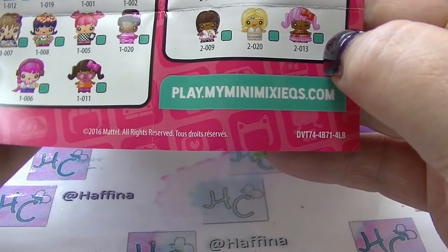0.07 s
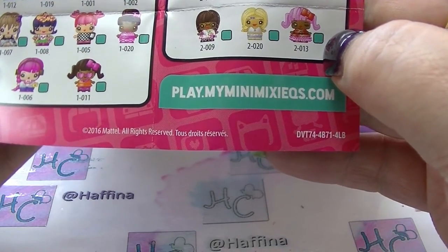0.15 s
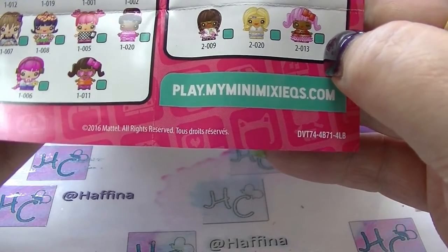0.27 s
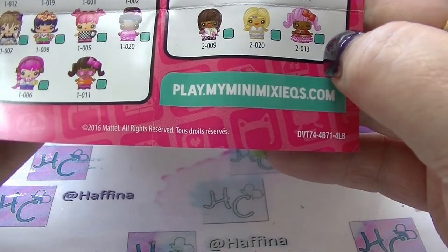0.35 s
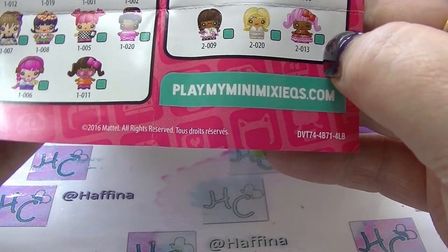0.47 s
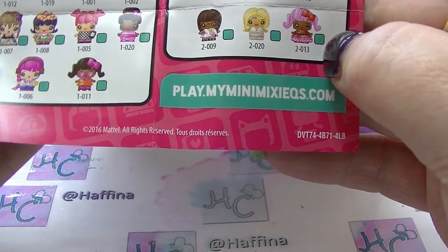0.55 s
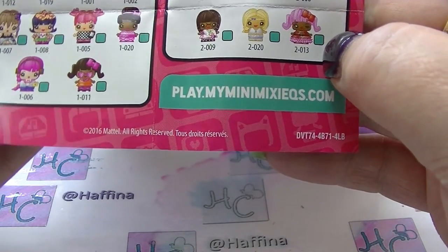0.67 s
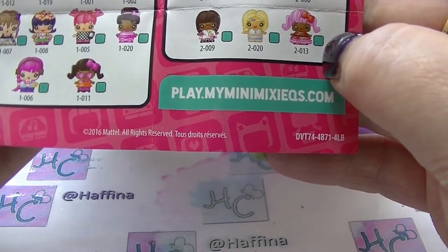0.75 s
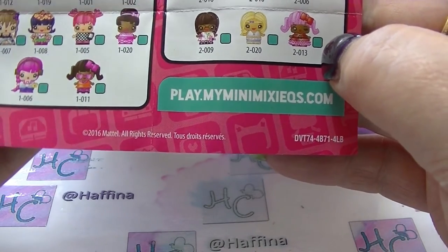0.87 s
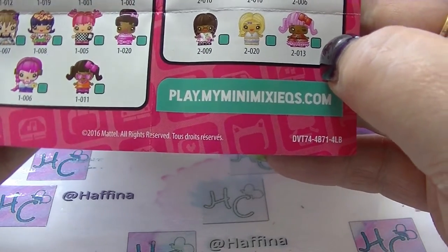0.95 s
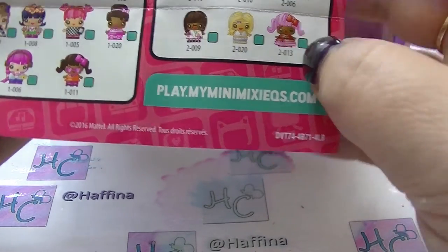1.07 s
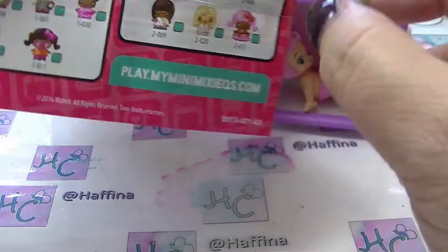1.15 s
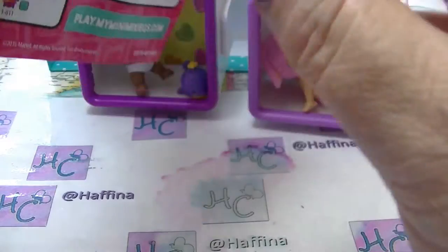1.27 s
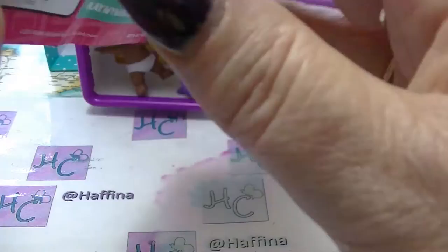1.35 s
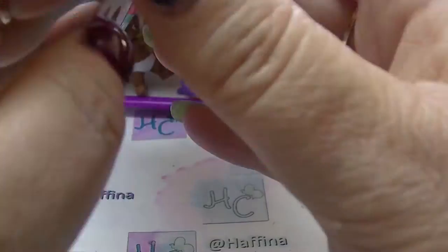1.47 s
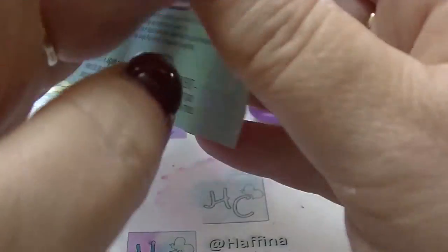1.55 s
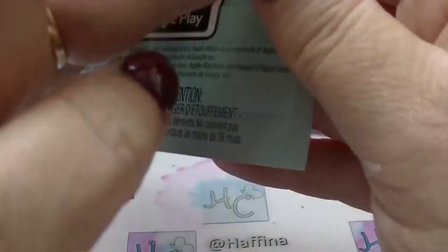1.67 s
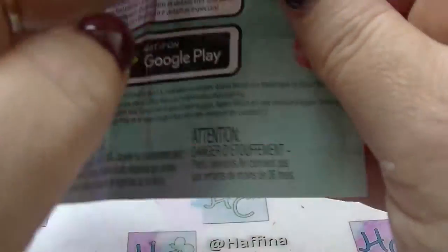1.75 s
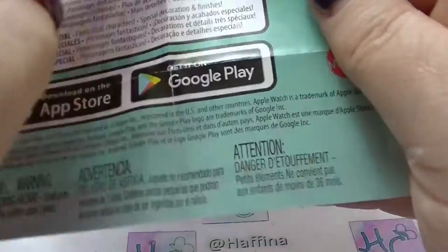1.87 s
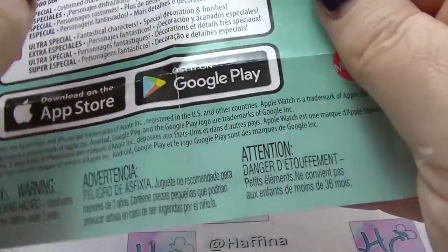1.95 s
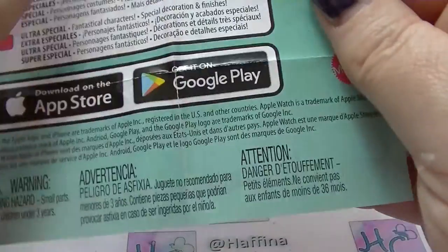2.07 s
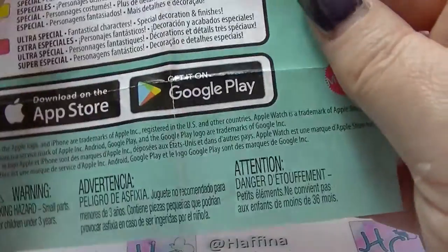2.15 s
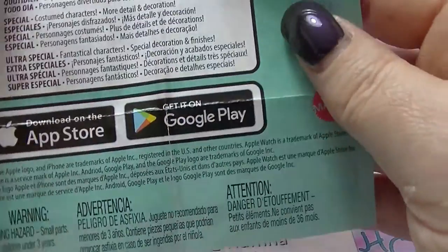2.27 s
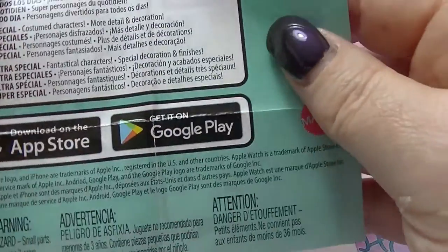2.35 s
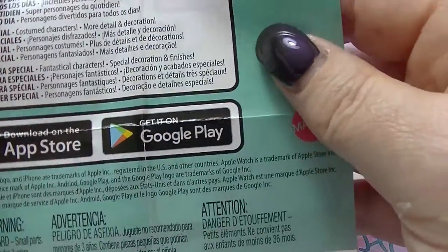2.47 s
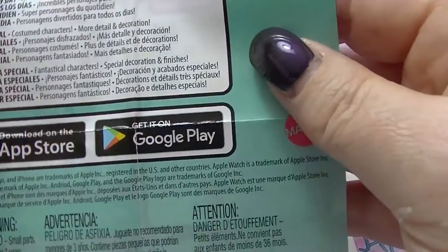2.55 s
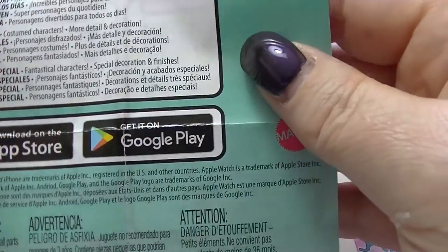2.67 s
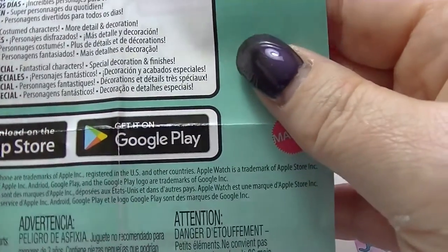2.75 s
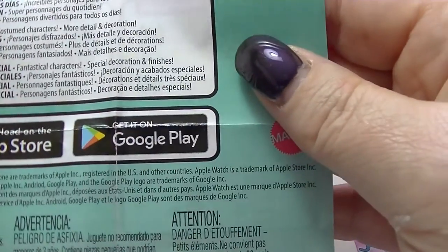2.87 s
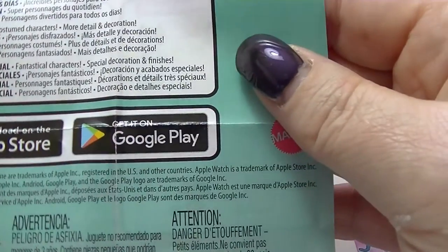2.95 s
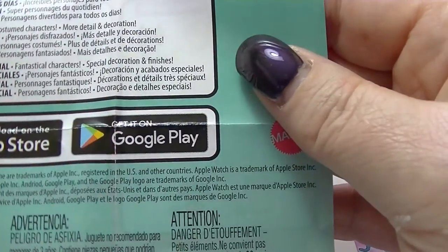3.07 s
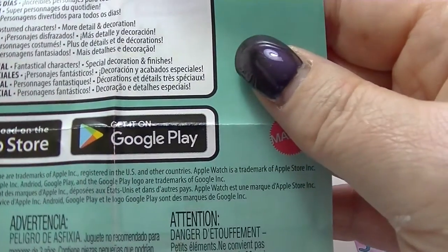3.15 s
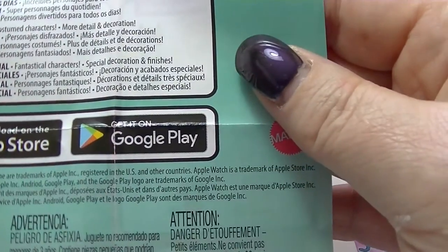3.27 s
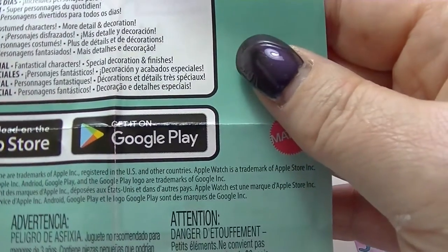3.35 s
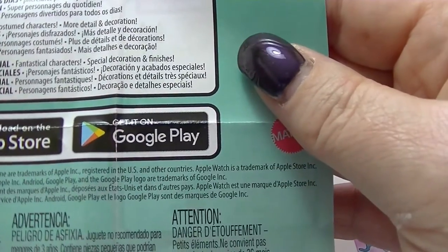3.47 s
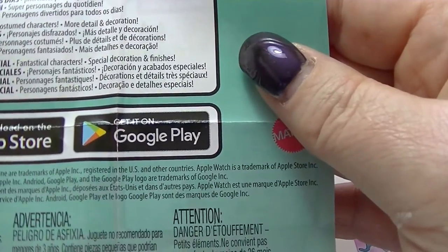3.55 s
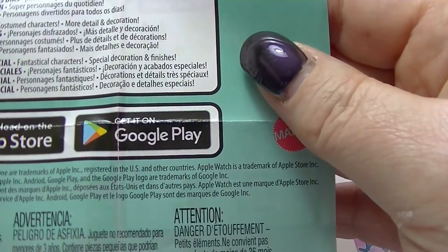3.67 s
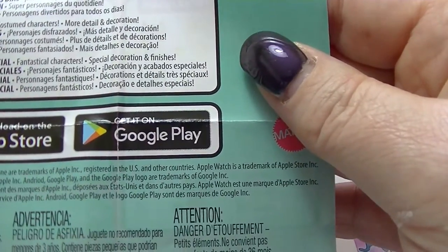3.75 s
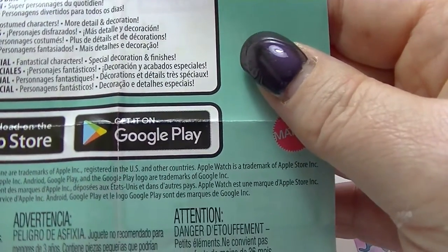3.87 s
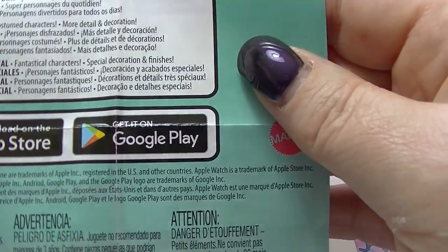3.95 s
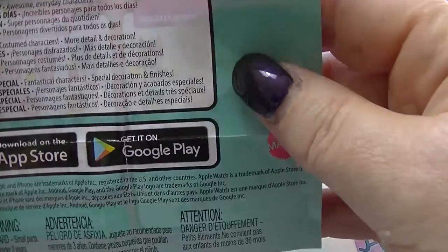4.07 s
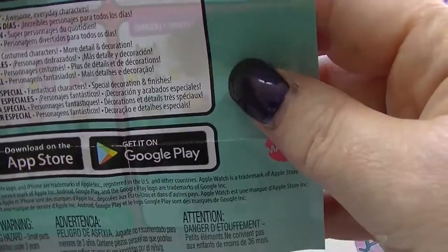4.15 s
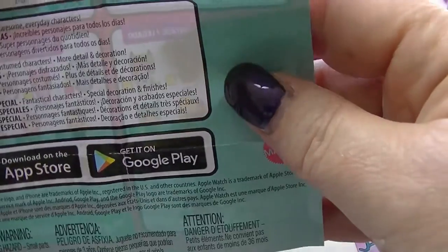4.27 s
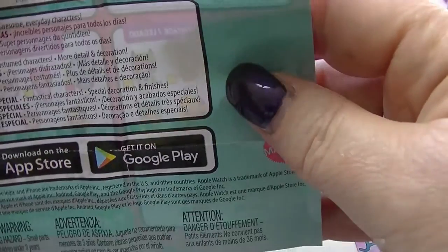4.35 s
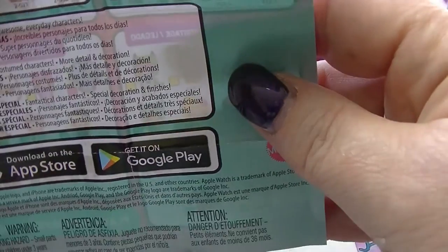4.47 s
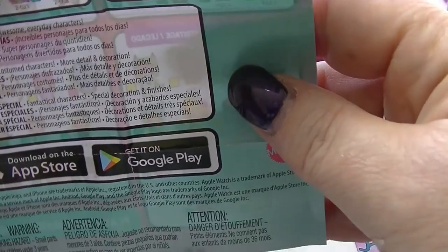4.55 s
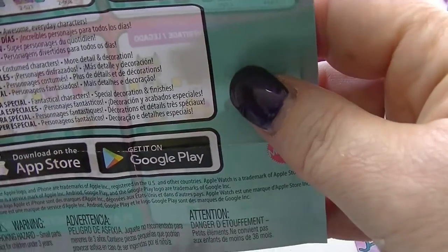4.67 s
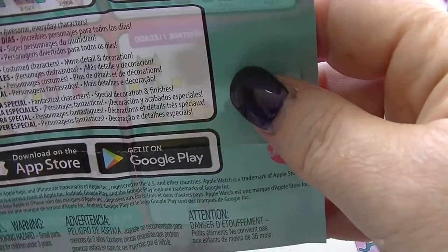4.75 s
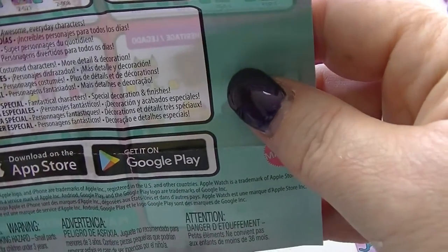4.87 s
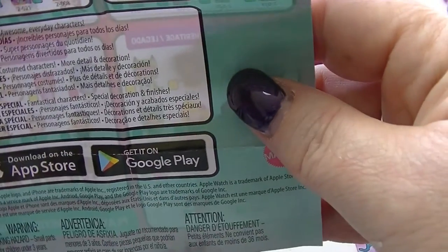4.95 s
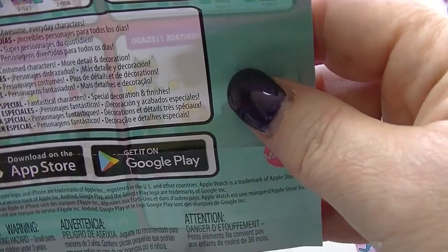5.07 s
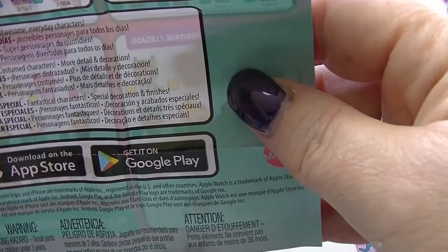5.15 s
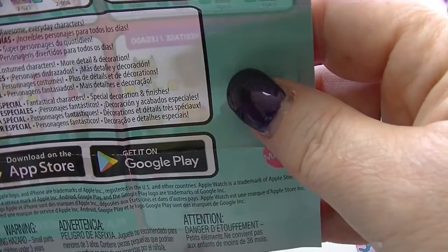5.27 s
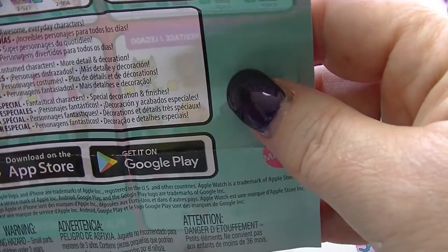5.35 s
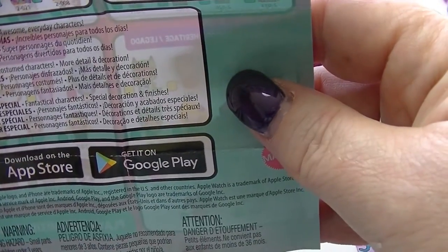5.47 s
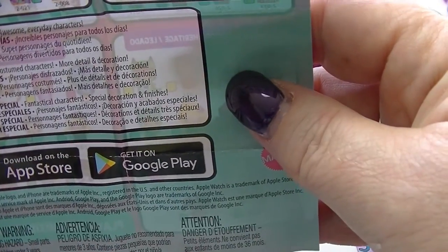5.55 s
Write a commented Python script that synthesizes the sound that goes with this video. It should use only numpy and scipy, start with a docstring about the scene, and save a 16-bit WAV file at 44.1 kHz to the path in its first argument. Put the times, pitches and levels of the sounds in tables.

```python
"""Soft microphone hiss and a faint slide of paper come first; soon sharp creases snap.
A folded leaflet is turned over and shifted in two hands close to a small camera in a quiet room.
Shaped noise makes the hiss and the sliding; clicks with rings and crackle make the snaps.
A finger or nail taps the sheet with short blows, and the lens motor ticks in regular steps as it refocuses.
Echoes of hands, table and room surround the paper."""
import sys
import numpy as np
from scipy import signal
from scipy.fft import rfft, irfft
from scipy.io import wavfile
from scipy.ndimage import uniform_filter1d

SR = 44100
rng = np.random.default_rng(int(sys.argv[2]) if len(sys.argv) > 2 else 0)


def int16_out(signal):
    """Quantize to a 16-bit WAV file."""
    q = np.round(np.clip(np.atleast_2d(signal).T, -1, 1) * 32767)
    wavfile.write(sys.argv[1], SR, q.astype(np.int16))


N = 247401  # length in samples


def gain_of(db):
    """Turns decibels into a factor."""
    return 10 ** (np.asarray(db) / 20)


def evened(x):
    """Scales a sound to an average (rms) strength of 1."""
    return x / np.sqrt(np.mean(x ** 2) + 1e-20)


def read(points, hz):
    """Reads a spectrum table, with straight lines between points on a log-frequency axis."""
    table_hz, value = np.transpose(points)
    return np.interp(np.log(hz + 1), np.log(table_hz + 1), value)


def shaped(x, points):
    """Filters a full-length sound by a spectrum table."""
    return irfft(rfft(x) * gain_of(read(points, np.fft.rfftfreq(N, 1 / SR))), N)


def add(mix, s, sound):
    """Mixes a sound in from time s, cut off at the end of the scene."""
    part = mix[..., round(s * SR):][..., :sound.shape[-1]]
    part += sound[..., :part.shape[-1]]


def ring(hz, t60):
    """One ringing tone of energy 1 that fades by 60 dB in t60 seconds."""
    t = np.arange(1024) / SR
    wave = np.sin(2 * np.pi * hz * t) * gain_of(-60 * t / t60)
    return wave / np.linalg.norm(wave)


# Cavities in front of the microphones: (frequency [Hz], width [Hz], lift [dB])
CAVITIES = [(1949, 113, 5), (2650, 440, 7), (3990, 1400, 3), (4986, 290, 4.5), (6800, 2500, 8),
            (9190, 920, 6)]


def lifts(hz):
    """Air in the microphone cavities resonates and lifts some frequencies; gives the lift in dB."""
    return sum(lift / (1 + (2 * (hz - f) / width) ** 2) for f, width, lift in CAVITIES)


def colour(points, size=2048):
    """A filter of energy 1 for a spectrum heard through the cavities, with no sound ahead of its cause."""
    hz = abs(np.fft.fftfreq(size, 1 / SR))
    log_gain = np.log(gain_of(read(points, hz) + lifts(hz)))
    # the minimum phase that belongs to this gain
    phase = -signal.hilbert(log_gain).imag
    response = np.fft.ifft(np.exp(log_gain + 1j * phase)).real[:size // 2]
    return response / np.linalg.norm(response)


# Colour of the hiss: (frequency [Hz], relative level per Hz [dB])
HISS_COLOUR = [(12, -33), (20, -17.5), (177, -17.5), (410, -2.5), (624, -12), (678, -10), (780, -11.5),
               (1440, -10.5), (2080, -6.5), (2320, -4), (3340, -7), (4810, -6.5), (16000, -18.5)]
# Left-minus-right part against the left-plus-right part: (frequency [Hz], level [dB])
HISS_WIDTH = [(60, 5), (150, 6), (380, 2.5), (950, 4.5), (2380, 0.5), (5980, -1.5), (15000, -2)]
HISS_DB = -62  # rms of the part shared by left and right


def hiss():
    """Steady noise of room and microphones: a part shared by both sides and a part of opposite sign."""
    cavities = gain_of(0.08 * lifts(np.fft.rfftfreq(N, 1 / SR)))
    noises = rng.standard_normal((2, N))
    mid, side = (shaped(irfft(rfft(noise) * cavities, N), HISS_COLOUR) for noise in noises)
    side = shaped(side, HISS_WIDTH)
    return gain_of(HISS_DB) / mid.std() * np.array([mid + side, mid - side])


def echoes(x, first, t60):
    """Many reflections return as scattered copies of random sign that die away."""
    at = np.arange(round(first * SR), 6000, 20)
    copies = np.zeros(6020)
    signs = rng.choice([-1., 1.], len(at))
    copies[at + rng.integers(0, 20, len(at))] = signs * gain_of(-60 * at / SR / t60)
    return signal.oaconvolve(x, copies / np.linalg.norm(copies))[:N]


# Nearby echoes that differ left and right: (frequency [Hz], level [dB])
NEAR_COLOUR = [(60, -10), (150, 5), (380, -22), (950, -7.5), (2380, -21), (5980, -3), (15000, -31)]


def near_echoes(middle):
    """Close reflections differ left and right: three echo patterns take turns steadily."""
    turns_per_s = 7.0
    turn = 2 * np.pi * (np.arange(N) / SR * turns_per_s + np.arange(3)[:, None] / 3)
    weights = (2 / 3) ** .5 * np.cos(turn)  # their squares always add up to 1
    near = sum(echoes(middle * weight, 0.00032, t60=0.003) for weight in weights)
    return shaped(near, NEAR_COLOUR) * [[1], [-1]]


# Runs of the lens motor: (first step [s], last step [s], level before the left-right gain [dB])
FOCUS_RUNS = [(2.4784, 2.7592, -44), (4.4392, 4.9184, -44)]
# Colour of the gear rattle: (frequency [Hz], relative level per Hz [dB])
GEAR_COLOUR = [(700, -15.5), (1100, -2), (1560, 6), (2300, -11), (3000, -23)]
GEAR_DB = -18  # typical gear level, against the barrel
STEP_S = 0.03995  # time between motor steps
BARREL_HZ, BARREL_T60 = 3210, 0.025  # typical ring of the lens barrel (Hz), its fade by 60 dB (s)


def lens():
    """Each motor step rings the lens barrel and rattles a gear, a little louder on the left."""
    out, t = np.zeros(N), np.arange(3000) / SR
    gear_filter = colour(GEAR_COLOUR)
    steps = [(s, db) for first, last, db in FOCUS_RUNS
             for s in np.arange(first, last + STEP_S / 2, STEP_S)]
    for (s, db), noise in zip(steps, rng.standard_normal((len(steps), len(t)))):
        # the first noise values also vary pitch and levels a little
        barrel_hz = BARREL_HZ * (1 + 0.0049 * noise[0])
        barrel = gain_of(-60 * t / BARREL_T60) * np.sin(2 * np.pi * barrel_hz * t)
        gear_gain = gain_of(GEAR_DB + 3.1 * noise[1] - 60 * t / 0.097)
        gear = gear_gain * signal.fftconvolve(noise, gear_filter)[:len(t)]
        rise = 1 - np.exp(-t / 0.0023)
        add(out, s, gain_of(db + 1.3 * noise[2]) * (barrel + gear) * rise)
    return out * gain_of([[1.4], [-1.4]])  # dB left, right


# A finger or nail taps the sheet: (time [s], peak level before the bass cut [dB], strongest [Hz],
# bass [dB], top limit [Hz], level there [dB], treble [dB], rattle [dB], rattle fade by 60 dB [s])
TAP_BLOWS = [(2.939, -26, 1110, -18.5, 2930, -13.5, -44, -7, 0.023),
             (3.8221, -19, 1860, -7, 3020, -4.5, -16, 7, 0.024),
             (4.187, -28, 1520, -2.5, 2600, 2, -21, 2.5, 0.027)]


def taps():
    """A blunt blow: even colour up to a limit set by the contact time, then a short rattle."""
    out, t = np.zeros(N), np.arange(2500) / SR
    for row, noise in zip(TAP_BLOWS, rng.standard_normal((len(TAP_BLOWS), len(t)))):
        s, db, peak_hz, bass_db, top_hz, top_db, treble_db, rattle_db, t60 = row
        rattle = noise * gain_of(-60 * t / t60)
        blow = (t == 0) + gain_of(rattle_db) * rattle / np.linalg.norm(rattle)
        tone = [(100, bass_db - 11), (450, bass_db), (peak_hz, 0), (top_hz, top_db),
                (1.74 * top_hz, treble_db), (16000, treble_db - 44.0)]
        tap = signal.fftconvolve(blow, colour(tone))
        add(out, s, gain_of(db) * tap / abs(tap).max())
    return out


def drift(seconds):
    """Smoothed random wander of rms 1."""
    size = max(round(seconds * SR), 1)
    return evened(uniform_filter1d(uniform_filter1d(rng.standard_normal(N), size), size))


def patchy(x, db):
    """The bending sheet keeps shifting its resonances: patches of some hundred Hz by some ten ms."""
    z = signal.stft(x, nperseg=256, noverlap=192)[2]
    field = uniform_filter1d(rng.standard_normal(z.shape), size=2, axis=0)
    field = uniform_filter1d(uniform_filter1d(field, size=20, axis=1), size=20, axis=1)
    return signal.istft(z * gain_of(db * evened(field)), nperseg=256, noverlap=192)[1][:N]


# Colours of paper noise, from the lowest range to the top, for slides and snaps:
# (frequency [Hz], relative level per Hz [dB])
BOOM_COLOUR = [(60, -25), (200, -15), (400, -9.5), (780, 6.5), (1200, 5), (1500, -29), (2500, -80)]
BODY_COLOUR = [(800, -39), (1300, -11.5), (1700, -2), (3000, -3), (3600, -4), (5000, -61.5)]
CRISP_COLOUR = [(2200, -53), (3200, -26.5), (3700, 0.5), (5300, -3), (6000, -18), (8000, -61.5)]
EDGE_COLOUR = [(4000, -42), (5700, -4), (6600, 0.5), (9000, -5), (12000, -9), (16000, -25)]
PAPER_COLOURS = (BOOM_COLOUR, BODY_COLOUR, CRISP_COLOUR, EDGE_COLOUR)
# Narrow bands near the microphone cavity resonances that stand out in gentle slides:
# (frequency [Hz], fade by 60 dB of each of two rings in a row [s], level against the slide [dB])
NARROW_BANDS = [(2680, 0.0058, -8), (4967, .005, -7.5)]
NARROW_TOP_DB = -59  # the slide level that drives these bands stops growing here
SLIDE_BOOM_DB, BOOM_SINK = -19.5, 0.31  # boom under a -46.5 dB slide; dB it sinks per dB of slide
SLIDE_CRISP_DB, SLIDE_EDGE_DB = -0.5, -4.5  # upper ranges against the body at brightness 0
# Sliding of the sheet, one list a movement:
# (time [s], level of the body range before the bass cut [dB], brightness [dB])
SLIDE_MOVES = [
    [(0.0, -67, 0.5), (0.307, -73, 2), (0.5, -82, 2)],
    [(0.93, -79, -3), (0.96, -64.5, 5), (0.994, -71, -6), (1.03, -47.5, -2.5), (1.06, -45, -1.5),
     (1.082, -57, -1), (1.139, -78, 0)],
    [(1.14, -92, 0), (1.203, -56.5, -0.5), (1.241, -59, -4), (1.289, -49.5, -8), (1.329, -49, -8),
     (1.387, -62, 4), (1.413, -42.5, -3.5), (1.449, -33.5, -10.5), (1.49, -38, 3.5), (1.512, -44, -7),
     (1.56, -59, -2)],
    [(1.561, -56, 1), (1.632, -43, -3.5), (1.72, -41, 0), (1.772, -37.5, 0.5), (1.792, -39, -1.5),
     (1.804, -46, 2), (1.822, -38, -0.5), (1.902, -44.5, 4.5), (1.94, -46, -4.5), (1.987, -57, -1)],
    [(1.988, -48.5, -8), (2.063, -48.5, -7.5), (2.113, -45.5, -6.5), (2.147, -58, 4), (2.213, -48, -4),
     (2.341, -69, 2.5), (2.409, -58, -5), (2.44, -67, 1), (2.518, -57.5, -2), (2.618, -76, 1)],
    [(3.141, -88, -2), (3.199, -58.5, -2), (3.3, -65, -1), (3.476, -74, -7), (3.572, -66, -16),
     (3.636, -70, -12)],
    [(3.859, -69, 4), (3.983, -51.5, 3), (4.001, -65.5, 2), (4.049, -56, -2), (4.175, -59.5, 6),
     (4.222, -67, 7), (4.248, -85, 0)],
    [(4.249, -83, 0), (4.262, -68.5, 10), (4.312, -55, -5), (4.328, -48, -7), (4.348, -51.5, -7),
     (4.392, -58.5, -0.5), (4.534, -61.5, -4.5), (4.659, -72, -10)],
]


def slides():
    """Fibres slip in clumps: a dense hiss plus small cracks, which grow when the sheet moves hard."""
    t, levels = np.arange(N) / SR, np.full((4, N), -150.)
    for rows in SLIDE_MOVES:
        s, db, bright_db = np.transpose(rows)
        now = (t >= s[0]) & (t < s[-1])
        boom_db = SLIDE_BOOM_DB - BOOM_SINK * (db + 46.5)
        ranges_db = (boom_db, 0, SLIDE_CRISP_DB + bright_db, SLIDE_EDGE_DB + bright_db)
        for level, more in zip(levels, ranges_db):
            level[now] = np.interp(t[now], s, db + more)
    body_db = levels[1]
    cracks = gain_of(4 * np.minimum(rng.exponential(1, N), 5))
    # about 900 cracks a second, of random sign
    cracks = cracks * (rng.random(N) < 900 / SR) * rng.choice([-1, 1], N)
    hard = np.clip((body_db + 56) / 22, .1, 1)
    slips = rng.standard_normal(N) + 0.77 * hard * evened(cracks)
    slips = patchy(slips * gain_of(2.1 * drift(0.0032)), db=2.4)
    narrow = np.zeros(N)
    for hz, t60, db in NARROW_BANDS:
        band = np.convolve(ring(hz, t60), ring(hz, t60))
        narrow += gain_of(db) * evened(signal.oaconvolve(slips, band)[:N])
    out = gain_of(np.minimum(body_db, NARROW_TOP_DB)) * narrow
    for points, level in zip(PAPER_COLOURS, levels):
        out += gain_of(level) * evened(signal.oaconvolve(slips, colour(points))[:N])
    return out


DRY_DB, SCRAPE_DB = 7.5, 13  # crackle of a dry snap and of a full scrape
DRY_RISE_S, SCRAPE_RISE_S = .00009, 0.0017  # how softly their crackle starts
CRACKLE_T60, T60_GROWTH = .022, 0.38  # length of a 0 dB crackle (s); dB of length per dB of crackle
CRACKLE_HOLD = 1.35  # above 1 the crackle holds a moment and then stops quickly
EDGE_T60, EDGE_GROWTH = 0.069, 0.068  # extra fade of the top range in dry snaps (s); its rise per dB
SNAP_EDGE_DB = -1  # top range of a -16 dB snap at brightness 0
SNAP_PAN_DB, SNAP_PAN_SPREAD_DB = -1, 1  # left over right: typical, random spread
# Creases that let go, from dry snaps to scrapes that are mostly crackle:
# (time [s], peak level of the body range before pan and bass cut [dB], panel ring [Hz],
# sheet ring [Hz], boom [dB], brightness [dB], crackle [dB])
CREASE_SNAPS = [(0.6089, -36, 3170, 1110, -25, -4.5, -2), (0.7341, -49.5, 2690, 520, -12, -2, 2),
                (0.9718, -55, 4570, 1160, -18, 8, 18), (0.991, -45, 4560, 730, -12, 6, 14),
                (1.0257, -23.5, 2300, 540, -15, 0.5, 5), (1.0609, -31.5, 3130, 1140, -14.5, -12, 2),
                (1.1634, -40.5, 2870, 387, -14, -7, 1), (1.2186, -35, 4300, 830, -21, -3.5, 2.5),
                (1.2545, -24, 2520, 910, -22, -9, -1), (1.2982, -20.5, 2410, 400, -18, 0.5, 3.5),
                (1.311, -23, 2800, 1300, -13, -2, 5), (1.3377, -28, 3140, 703, -30, -2, 23.5),
                (1.3708, -23.5, 2650, 1030, -38, -10, 0.5), (1.4023, -23, 3100, 999, -53, -2.5, 3),
                (1.4391, -34, 2750, 920, -48, 4.5, 11), (1.4753, -34, 3990, 760, -22, 4, 20),
                (1.4995, -28, 2640, 756, -27, -1, -1), (1.5729, -41.5, 2700, 840, -13.5, 2.5, 3),
                (1.5856, -33, 2860, 867, -23, -5, 10.5), (1.6354, -28.5, 4100, 770, -14.5, -9.5, 11),
                (1.666, -27.5, 4240, 1120, -8, -8, -4), (1.6913, -27, 4130, 850, -36, -5, 20),
                (1.698, -16.5, 4130, 840, -17, -4.5, -0.5), (1.778, -25, 2610, 904, -30, -19, -1),
                (1.8098, -23.5, 2760, 746, -24, -9, 1), (1.8307, -27.5, 2740, 780, -15.5, -4.5, 17),
                (1.867, -19.5, 3100, 1210, -12, -8, 10), (1.914, -30.5, 2680, 783, -14.5, -14, 1),
                (1.9205, -33.5, 1960, 690, -2, -10, 3), (1.959, -13, 2650, 760, -17, -3, 1),
                (2.01, -30.5, 2640, 1080, -35, -21, -3), (2.0503, -30.5, 2600, 1020, -47, -13, 14),
                (2.0689, -29, 2600, 606, -40, -12.5, 4), (2.2597, -27, 2030, 790, -19.5, -1, -4.5),
                (2.2886, -33.5, 2410, 1020, -20, -3.5, 5.5), (2.4006, -45.5, 4800, 1240, -23, -5, 19),
                (2.4539, -45, 2470, 462, -14, 3, -2), (2.587, -54, 3200, 405, 0, -9, 14),
                (2.874, -48.5, 3600, 433, -21, -2.5, 1), (3.4166, -47, 1970, 1110, -7, -3, -2),
                (3.436, -47.5, 2930, 1130, -6.5, -4, 2.5), (3.501, -45.5, 2480, 1120, -20, -8, 5),
                (3.5433, -46, 2680, 888, -33, -16, 1), (3.7483, -51.5, 2110, 444, -9, -16, 6),
                (3.9309, -45, 4470, 740, -4.5, 7, -6), (3.9566, -41, 2000, 999, -10, -16, -8),
                (3.9673, -40.5, 2530, 423, -14.5, -2, 7), (4.125, -45, 2550, 719, -23, -17, 0),
                (4.2047, -36, 2560, 740, -24, -2, 2.5), (4.293, -45.5, 2420, 1200, -2.5, 3, 22),
                (4.319, -40, 2380, 830, -10, -5, 10), (4.3287, -36, 1840, 1150, -28, -2, 11),
                (4.3532, -35.5, 1860, 1250, -9.5, -2.5, 10.5), (4.553, -52.5, 3100, 1130, -1, -11, 7.5)]


def snaps():
    """A crease lets go, rings the paper beside it and crackles; more crackle is softer and longer."""
    out, t = np.zeros((2, N)), np.arange(3500) / SR
    boom, body, crisp, edge = (colour(points) for points in PAPER_COLOURS)
    for row, noise in zip(CREASE_SNAPS, rng.standard_normal((len(CREASE_SNAPS), len(t)))):
        s, db, panel_hz, sheet_hz, boom_db, bright_db, crackle_db = row
        soft = np.clip((crackle_db - DRY_DB) / (SCRAPE_DB - DRY_DB), 0, 1)
        rise = DRY_RISE_S * (SCRAPE_RISE_S / DRY_RISE_S) ** soft
        t60 = CRACKLE_T60 * gain_of(T60_GROWTH * crackle_db)
        crackle = noise * gain_of(-60 * (t / t60) ** CRACKLE_HOLD) * (1 - np.exp(-t / rise))
        # one click, then the crackle
        burst = (t == 0) + gain_of(crackle_db) * crackle / np.linalg.norm(crackle)
        edge_burst = burst * gain_of(-60 * (1 - soft) * t / EDGE_T60)
        panel = .6 * ring(panel_hz, t60=.009)
        low = panel_hz < 3400  # a low panel rings in the body range, a high one in the crisp range
        sheet = ring(sheet_hz, t60=15 / sheet_hz)
        tones = (0.4 * boom + sheet, body + low * panel, crisp + (1 - low) * panel, edge)
        drives = (burst, burst, burst, edge_burst)
        parts = [signal.fftconvolve(drive, tone) for drive, tone in zip(drives, tones)]
        edge_db = bright_db + SNAP_EDGE_DB + EDGE_GROWTH * (db + 16)
        ranges_db = (boom_db, 0, bright_db, edge_db)
        snap = sum(gain_of(db + more) * p / abs(p).max() for p, more in zip(parts, ranges_db))
        pan_db = SNAP_PAN_DB + SNAP_PAN_SPREAD_DB * noise[0]
        add(out, s, snap * gain_of([[pan_db / 2], [-pan_db / 2]]))
    return out


LOW_CUT_HZ = 335  # a small sheet radiates hardly any bass
LAG_S = 1.6e-5  # the right microphone is a little further away


def scene():
    """Paper with the echoes of hands, table and room, plus lens and hiss."""
    sheet = slides() + snaps() + taps()
    paper = signal.lfilter(*signal.butter(2, LOW_CUT_HZ, "high", fs=SR), sheet)
    middle = paper.mean(0)
    lag = np.exp(-2j * np.pi * np.fft.rfftfreq(N, 1 / SR) * LAG_S)
    paper[1] = irfft(rfft(paper[1]) * lag, N)
    # one later copy with left and right swapped
    wall = gain_of(-23.5) * np.roll(paper[::-1], round(0.01 * SR), axis=1)
    room = gain_of(-17.0) * np.array([echoes(middle, 0.014, t60=0.057) for _ in range(2)])
    return paper + near_echoes(middle) + wall + room + lens() + hiss()


EDGE_HZ = 16050  # highest frequency the recorder keeps


def record(dry):
    """The recorder's band limit: a steep filter takes away the very highest treble."""
    band_limit = signal.firwin(511, EDGE_HZ, window=("kaiser", 9), fs=SR)
    return signal.oaconvolve(dry, band_limit[None], "same")


dry = scene()
out = record(dry)
int16_out(out)
```